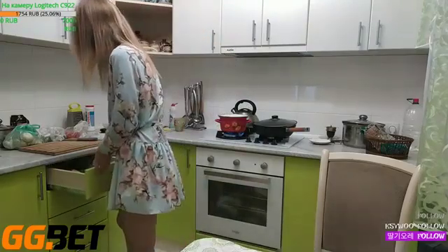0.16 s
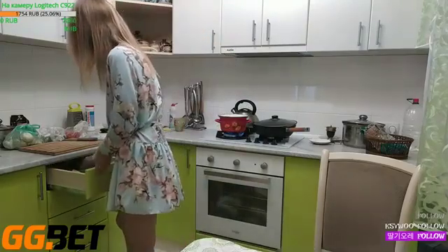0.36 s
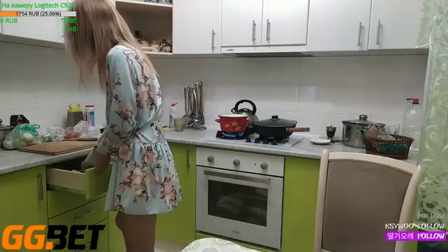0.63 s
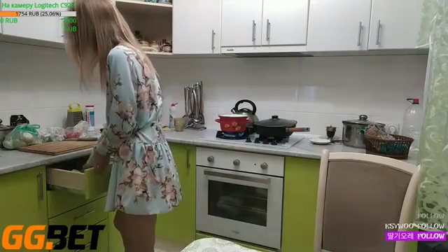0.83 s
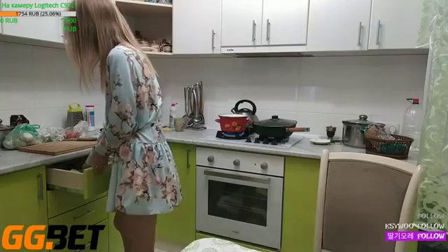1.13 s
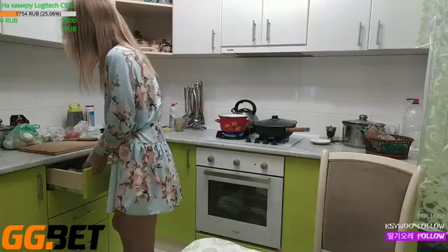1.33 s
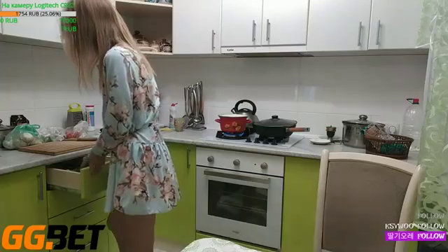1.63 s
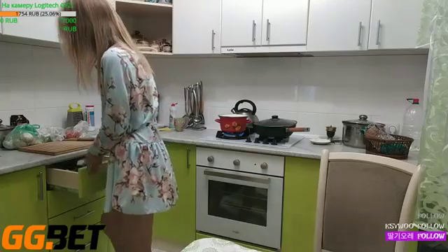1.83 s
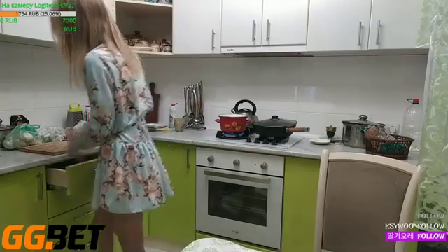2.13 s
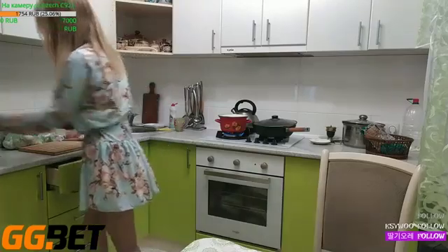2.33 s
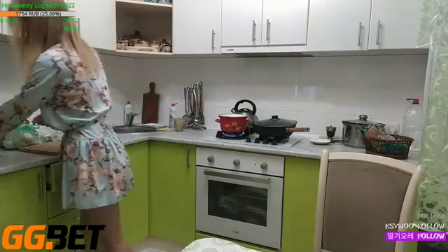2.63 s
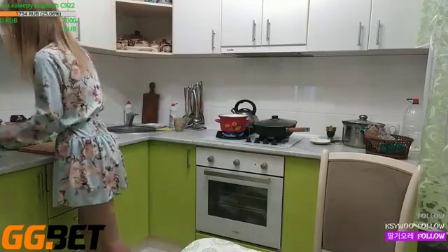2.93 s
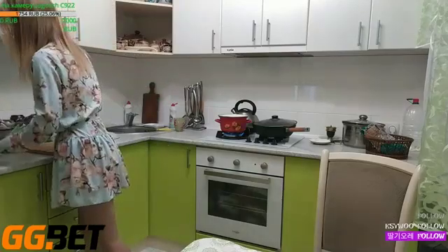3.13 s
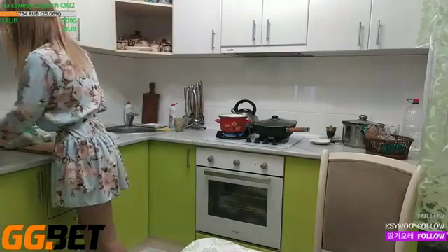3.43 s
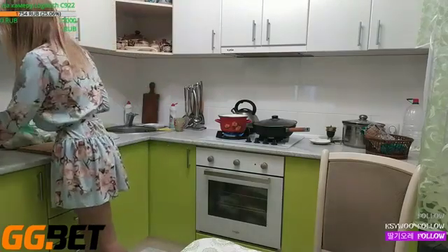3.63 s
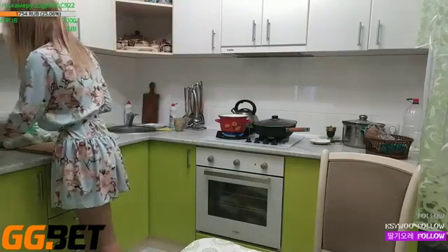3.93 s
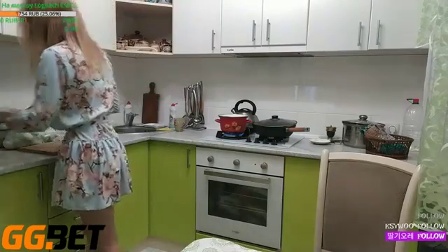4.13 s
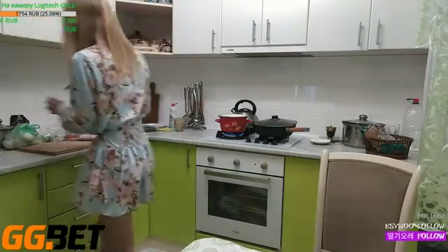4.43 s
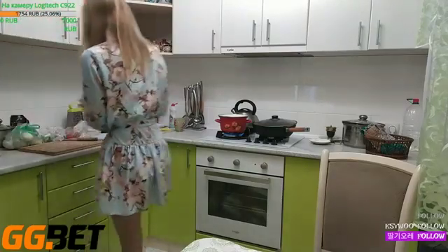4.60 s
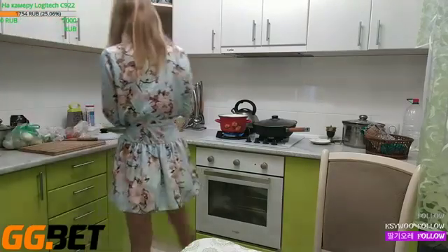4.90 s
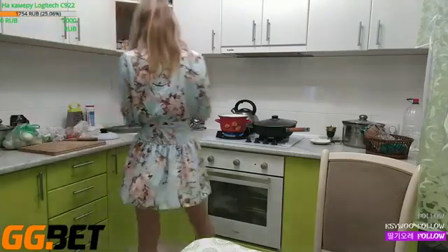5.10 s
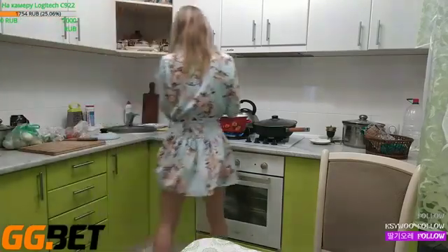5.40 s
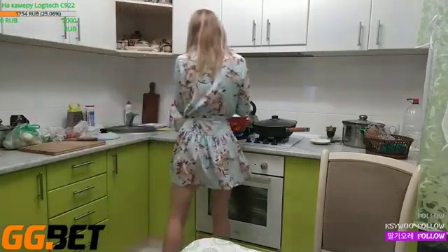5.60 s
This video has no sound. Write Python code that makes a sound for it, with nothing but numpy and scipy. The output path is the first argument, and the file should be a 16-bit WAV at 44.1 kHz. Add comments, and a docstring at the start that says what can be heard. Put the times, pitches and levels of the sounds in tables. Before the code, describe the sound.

Drawer rumble and knocks, clattering steel utensils, a closing roll with faint plastic crinkle, one loud set-down, then small dry rustles and clicks over hiss.

```python
"""Over a steady background hiss of filtered noise, a wooden drawer rolls open in a small tiled kitchen: filtered
grains make its rollers, bursts of tiny impacts its knocks, and soft sine tones swell. A hand rummages in ringing
cutlery. The drawer rolls shut while a plastic bag crinkles as filtered noise. Something is set down hard on the
worktop and shoved along it, again bursts of impacts. At last a small object slides, as a dry rustle of grains, and
clicks lightly, with a faint squeak from a shaky sine. Every contact rings on and echoes across the room."""
import sys
import numpy as np
from scipy import signal
from scipy.fft import rfft, irfft, next_fast_len
from scipy.io import wavfile
from scipy.ndimage import uniform_filter1d

SR = 44100
rng = np.random.default_rng(int(sys.argv[2]) if len(sys.argv) > 2 else 0)


def dump(signal):
    """Clip the signal to [-1, 1] and save it as 16-bit WAV at the path in sys.argv[1]."""
    limited = np.clip(np.atleast_2d(signal).T, -1, 1)
    pcm = np.round(limited * 32767).astype(np.int16)
    wavfile.write(sys.argv[1], SR, pcm)


N = 253619
RING = SR * 3 // 4  # samples in the room's tail and in each ring
# In the tables, "level before trim" is a level that the playing function still shifts by a fixed number of dB.


def amp(db):
    """Turn decibels into a gain."""
    return 10 ** (np.asarray(db) / 20)


def unit(x):
    """Scale x to an rms of 1."""
    return x / np.sqrt(np.mean(x ** 2) + 1e-20)


def crest(x):
    """Scale x so that its loudest 350 samples have an rms of 1."""
    return x / np.sqrt(uniform_filter1d(x ** 2, size=350).max() + 1e-20)


def along(points, hz):
    """Read a curve of (Hz, value) points on a logarithmic frequency axis."""
    point_hz, values = np.transpose(points)
    return np.interp(np.log(hz + 1), np.log(point_hz + 1), values)


def curves(rows):
    """Return a soft gate, open over the rows' time span, then one value per sample for each column."""
    s, *columns = np.transpose(rows)
    t = np.arange(N) / SR
    is_open = (t >= s[0]) & (t <= s[-1])
    gate = uniform_filter1d(is_open * 1., size=900)
    return [gate] + [np.interp(t, s, column) for column in columns]


def filtered(x, response):
    """Shape the spectrum of x by a response that depends on frequency."""
    size = next_fast_len(len(x) + 8192)
    spectrum = rfft(x, size) * response(np.fft.rfftfreq(size, 1 / SR))
    return irfft(spectrum, size)[:len(x)]


def grainy(response, spread_db):
    """Send tiny slips of uneven size through a response, at an rms of 1."""
    sizes = amp(spread_db * rng.standard_normal(N))
    return unit(filtered(rng.standard_normal(N) * sizes, response))


def resonances(peaks):
    """Make the response of a few (Hz, width, dB) resonances whose signs alternate."""
    def response(f):
        total = 0
        for k, (hz, width, db) in enumerate(peaks):
            total = total + (-1) ** k * amp(db) * 1j * f * width / (hz * hz - f * f + 1j * f * width)
        return total
    return response


def impulse_response(spectrum, size=2048):
    """Find the causal sound of a tap on a body with this spectrum."""
    gains = amp(along(spectrum, np.fft.rfftfreq(size, 1 / SR)))
    # folding the cepstrum forward puts the energy as early as possible
    cepstrum = irfft(np.log(gains + 1e-4))
    cepstrum[1:size // 2] *= 2
    cepstrum[size // 2 + 1:] = 0
    return irfft(np.exp(rfft(cepstrum)))


def add(track, s, sound):
    """Mix a sound into the track at time s."""
    start = max(round(s * SR), 0)
    part = track[start:start + len(sound)]
    part += sound[:len(part)]


def swell(peak_s, rise_s, fall_s):
    """Make a smooth stroke: gain 1 at its peak, a tenth rise_s before it and fall_s after it."""
    t = np.arange(N) / SR - peak_s
    return .1 ** ((t / np.where(t < 0, rise_s, fall_s)) ** 2)


def strokes(rows):
    """Add up strokes given as (peak s, dB, rise s, fall s)."""
    return sum(amp(db) * swell(s, rise_s, fall_s) for s, db, rise_s, fall_s in rows)


def tone(hz, jitter):
    """Make a sine at rms 1 whose pitch shakes by this rms fraction, which roughens it."""
    hz = hz * (1 + jitter * grainy(lambda f: f < 120, spread_db=1.5))
    return np.sqrt(2) * np.sin(2 * np.pi * np.cumsum(hz) / SR)


# How long the kitchen echoes. Each row: frequency in Hz, time in seconds to fade by 60 dB.
ECHO_TIMES = [(100, 0.73), (300, 0.38), (1000, 0.37), (4000, 0.37), (13000, 0.12)]


def kitchen(early_db, direct_db=-10, early_s=0.056):
    """Make one path across the room: direct sound, answers from nearby surfaces, a diffuse tail."""
    hz, t, z = signal.stft(rng.standard_normal(RING), SR, nperseg=256)
    decay = amp(-60 * t / along(ECHO_TIMES, hz)[:, None])
    tail = signal.istft(z * decay, SR, nperseg=256)[1][:RING]
    near = np.exp(-np.arange(RING) / SR / early_s)
    # the first reflections are uneven and shifted by early_db
    tail *= amp(near * (early_db + 3.5 * rng.standard_normal(RING)))
    tail /= np.linalg.norm(tail)
    tail[0] += amp(direct_db)
    return tail


def ringing(modes, force, size_factor, damping, uneven_db, waver):
    """Modes build up while the force lasts, at a new strength each time; reflections make them waver."""
    t = np.arange(len(force)) / SR
    hz, mode_db, t60 = np.transpose(modes)[:, :, None]
    knots = np.arange(48) / 64  # moments in s at which the gains are drawn
    shape = (len(modes), len(knots))
    drift = rng.standard_normal(shape) + 1j * rng.standard_normal(shape)
    strength_db = mode_db + uneven_db * rng.standard_normal(hz.shape)
    fade = amp(strength_db - 60 * damping * knots / np.minimum(t60, .5))
    gains = (1 + waver * drift) * fade * np.exp(2j * np.pi * rng.random(hz.shape))
    phases = (2 * np.pi * hz * size_factor * t).astype(np.float32)
    ring = 0
    for gain, phase in zip(gains, phases):
        ring = ring + np.interp(t, knots, gain.real) * np.cos(phase)
        ring = ring + np.interp(t, knots, gain.imag) * np.sin(phase)
    return crest(ring * np.cumsum(force) / force.sum())


# Five pitch ranges, from thud to treble. Each row: lower edge in Hz, upper edge in Hz.
PITCH_RANGES = [(35, 350), (350, 900), (900, 2400), (2400, 5500), (5500, 16000)]


def strikes(events, body, modes, contact_s, ring_db, knock_db, presence_db, trim_db, damping, chatter_db,
            lead_s, partner_db, waver, uneven_db, early_db, ring_growth=0):
    """Each contact is a burst of tiny impacts: it shakes the body, rings both partners and fills the room."""
    track, t = np.zeros(N), np.arange(RING) / SR
    colour = impulse_response(body)
    filters = [signal.butter(4, edges, "bandpass", fs=SR, output="sos") for edges in PITCH_RANGES]
    # the force of a contact peaks after twice contact_s
    contact_s = max(contact_s, .0002)
    u = t / contact_s
    force = u ** 2 * np.exp(-np.minimum(u, 60))
    hardest_db = max(peak_db + bright_db for s, peak_db, thud_db, bright_db in events)
    for s, peak_db, thud_db, bright_db in events:
        impacts = force * rng.standard_normal(RING) * amp(chatter_db * rng.standard_normal(RING))
        # a short, hard contact is mostly one single impact
        impacts[1] += np.linalg.norm(impacts) * (.001 / contact_s) ** 1.5
        shake = signal.fftconvolve(impacts, colour)[:RING]
        shake = signal.fftconvolve(shake, kitchen(early_db))[:RING]
        own = ringing(modes, force, 1, damping, uneven_db, waver)
        # the other partner is a like piece of another size
        other = ringing(modes, force, rng.uniform(.72, 1.2), damping, uneven_db, waver)
        # where ring_growth is set, hard blows throw the pieces free, so that they ring more
        blow_ring_db = ring_db + ring_growth * (peak_db + bright_db - hardest_db)
        sound = crest(shake) + amp(blow_ring_db) * (own + amp(partner_db) * other)
        # thud sets the bass and brightness the treble; each pulls its neighbour by half
        band_db = [thud_db, thud_db / 2 + knock_db, 0, bright_db / 2 + presence_db, bright_db]
        blow = sum(amp(db) * crest(signal.sosfilt(sos, sound)) for sos, db in zip(filters, band_db))
        add(track, s - lead_s, amp(peak_db + trim_db) * blow)
    return track


# The broad colour of the background hiss. Each row: frequency in Hz, relative level in dB.
HISS_COLOUR = [(30, -21.5), (200, -11.5), (700, -16.5), (1200, -17.5), (2600, -25), (3300, -5.5),
               (4300, -1.5), (5700, -1), (7300, -38), (8200, 0), (10300, -3.5), (11400, -16.5), (12200, 3),
               (13300, -24.5), (15000, -15)]
# Narrow bands that stand out in the background hiss.
# Each row: centre in Hz, half-width in Hz (gain down to 1/e), relative level in dB.
HISS_BANDS = [(3230, 63, 3.5), (4274, 210, 4.5), (5064, 56, 5), (5700, 90, 1.5), (6440, 100, -4),
              (8060, 140, -1.5), (8800, 34, -10.5), (13300, 60, -11), (14800, 130, -12.5)]


def hiss(broad_db=-58, bands_db=-61):
    """A steady background hiss, random at every pitch, with a few narrow bands standing out."""
    def bumps(f):
        return sum(amp(db) * np.exp(-((f - hz) / width) ** 2) for hz, width, db in HISS_BANDS)
    broad = unit(filtered(rng.standard_normal(N), lambda f: amp(along(HISS_COLOUR, f))))
    bands = unit(filtered(rng.standard_normal(N), bumps))
    return amp(broad_db) * broad + amp(bands_db) * bands


# Runs of the drawer. Each row: time of top speed in seconds, rumble level before trim in dB,
# level before trim of rattle and rasp in dB, rise and fall of the speed to a tenth in seconds.
DRAWER_RUNS = [(0.01, -40.5, -46.5, 0.062, 0.28), (2.08, -45, -43, 0.17, 0.18), (2.22, -45, -45, 0.14, .45),
               (2.5, -46, -52.5, 0.27, 0.41), (2.92, -49, -62, 0.053, 0.091)]
# Friction in the runners. Each row: frequency in Hz, relative level in dB.
RUNNER_COLOUR = [(120, -37), (200, -22), (241, 5), (469, -11.5), (512, -16), (634, -21), (755, -3.5),
                 (1030, -31.5), (1280, -9.5), (1710, -20.5), (2360, -21.5), (2580, -27.5), (4000, -20.5),
                 (5200, -51.5), (8800, -120)]
# Resonance of the cabinet. Each row: frequency in Hz, width in Hz, gain in dB.
CABINET = [(138.7, 15, 0)]
# Resonances of the drawer's panels. Each row: frequency in Hz, width in Hz, relative gain in dB.
DRAWER_PANELS = [(525.2, 16, 14), (774, 19, 2)]


def rollers():
    """The rollers bump along their runners, drum on cabinet and panels, and rasp; all grow with speed."""
    def runner(f):
        return amp(along(RUNNER_COLOUR, f))
    rumble = grainy(lambda f: resonances(CABINET)(f) / (1 + (f / 300) ** 4), spread_db=1.5)
    panels = grainy(lambda f: resonances(DRAWER_PANELS)(f) / (1 + (f / 1100) ** 4), spread_db=11.5)
    low_friction = grainy(lambda f: runner(f) / (1 + (f / 900) ** 8), spread_db=6)
    rattle = unit(amp(-4) * panels + low_friction)
    rasp = grainy(lambda f: runner(f) * (f > 950), spread_db=2.0)
    # bumps make the speed lurch, by 1.5 dB rms
    lurch = amp(1.5 * grainy(lambda f: f < 18, spread_db=3.5))
    out = np.zeros(N)
    for s, rumble_db, rattle_db, rise_s, fall_s in DRAWER_RUNS:
        speed = swell(s, rise_s, fall_s) * lurch
        out += amp(rumble_db - 2) * speed * rumble
        out += amp(rattle_db - 1) * speed ** 1.7 * rattle
        out += amp(rattle_db - 13) * speed ** 2 * rasp
    return out


# Knocks of the drawer. Each row: time in seconds, level of the mids before trim in dB,
# thud (bass against mids) in dB, brightness (treble against mids) in dB.
DRAWER_CONTACTS = [(0.056, -48, -14, -3), (0.172, -29, -12, -19.5), (0.565, -50.5, -8.5, -31),
                   (0.659, -37, -11, -14.5), (0.784, -50, -23, -6), (0.854, -26, -12.5, 2.5),
                   (0.871, -38, -2.5, 9.5), (2.058, -39, -1, -5), (2.582, -50.5, -9, -13.5),
                   (2.786, -37, 6.5, -14.5)]
# How the drawer's wood colours a knock. Each row: frequency in Hz, relative level in dB.
DRAWER_COLOUR = [(41, -49.5), (70, -15), (361, -7), (632, -2), (791, -6), (926, -8.5), (1390, 5.5),
                 (1940, -6.5), (2720, -11.5), (3480, -4.5), (4880, -20), (5340, -14), (7480, -19),
                 (9360, -11), (15000, -18.5)]
# What the drawer rings with. Each row: frequency in Hz, relative level in dB,
# time to fade by 60 dB in seconds (at most 0.5 is used, then divided by the damping).
DRAWER_RINGS = [(348, -6, 1), (728, -14, 0.56), (1417, 10, 0.15), (1670, -7, 0.71), (2176, 0.5, 0.099),
                (2304, 2, 0.23), (2360, -6, 0.1), (3260, -6, 0.22), (3630, -21, 0.58), (4550, -4, 0.098)]


def drawer_knocks():
    """Wood meets wood in soft contacts: a chattering shake and only a little ringing."""
    return strikes(DRAWER_CONTACTS, DRAWER_COLOUR, DRAWER_RINGS, contact_s=0.0026, ring_db=-15, knock_db=3.5,
                   presence_db=-0.5, trim_db=-3.0, damping=1.1, chatter_db=5.0, lead_s=.003, partner_db=-1,
                   waver=0.59, uneven_db=4.5, early_db=6.0)


# Soft low tones while the drawer is moved. Each row: time of the peak in seconds, level before trim in dB,
# mean pitch in Hz, rise and fall to a tenth in seconds.
LOW_TONES = [(0.321, -48, 337, .14, 0.13), (0.583, -43.5, 275, 0.019, 0.065), (0.695, -44, 280, .06, 0.032),
             (0.81, -61, 266, 0.07, 0.12)]


def low_tones(trim_db=3):
    """Smooth, almost pure low tones swell and fade as the drawer is moved."""
    return sum(amp(db + trim_db) * swell(s, rise_s, fall_s) * tone(hz, jitter=0.0066)
               for s, db, hz, rise_s, fall_s in LOW_TONES)


# How hard the hand stirs the tray. Each row: time in seconds,
# level of the small contacts in dB before scatter and trim.
STIRRING = [(1.171, -30.5), (1.23, -33.5), (1.29, -45), (1.35, -34), (1.42, -56), (1.5, -33.5), (1.62, -38),
            (1.77, -39.5), (1.811, -51.5), (1.87, -28), (1.9, -38.5)]


def jostle(count, thud_db=-4, bright_db=-1, scatter_db=1.5, scatter_s=.005):
    """Small contacts come at uneven moments while the hand stirs the cutlery."""
    s, db = np.transpose(STIRRING)
    chance = rng.standard_normal((count, 4))
    times = np.linspace(s[0], s[-1], count) + scatter_s * chance[:, 0]
    shifts_db = scatter_db * chance[:, 1:]
    return [(t, np.interp(t, s, db) + level, thud_db + thud, bright_db + bright)
            for t, (level, thud, bright) in zip(times, shifts_db)]


# Clashes of the cutlery. Each row: time in seconds, level of the mids before trim in dB,
# thud in dB, brightness in dB (bass and treble against the mids).
CLASHES = [(1.15, -24, -12, -7), (1.184, -35, -2, 3), (1.221, -29.5, -4.5, -8), (1.25, -29, -11, -3),
           (1.313, -32.5, -5.5, 3), (1.351, -37.5, -7.5, 7.5), (1.434, -36.5, 1, 10),
           (1.455, -31, -4, -3.5), (1.486, -34, -6, 9.5), (1.518, -28, -8.5, -18),
           (1.547, -35.5, -2.5, 6.5), (1.633, -23.5, -6, 11.5), (1.648, -21.5, -5, 2.5),
           (1.751, -26.5, -8, 1), (1.829, -22.5, -9, 2.5), (1.855, -27.5, -9, 3.5), (2.005, -36, -4, -4)]
# How the cutlery tray colours a contact. Each row: frequency in Hz, relative level in dB.
TRAY_COLOUR = [(41, -40), (70, -24.5), (206, -14.5), (288, -1), (386, -13.5), (505, -1.5), (632, -7.5),
               (1300, 1), (1940, -10.5), (3640, -4.5), (4670, -11), (5970, -10), (7650, -13.5),
               (10200, -5.5), (15000, -21)]
# What the steel rings with. Each row: frequency in Hz, relative level in dB,
# time to fade by 60 dB in seconds (at most 0.5 is used, then divided by the damping).
STEEL_RINGS = [(3564, -12.7, 0.43), (4032, -13.6, 0.42), (4247, -12.9, 0.41), (5884, -13.3, 0.37),
               (6078, 0.0, 0.37), (6885, -8.3, 0.36), (7063, -10.9, 0.35), (8452, -5.2, 0.34),
               (9200, -7.8, 0.33), (9318, -11.5, 0.33), (9458, -13.6, 0.32), (10153, -11.2, 0.32),
               (10390, -6.9, 0.32), (10557, -10.8, 0.31), (11181, -14.1, 0.31), (11300, -11.5, 0.31),
               (12209, -16.2, 0.3), (12355, -15.6, 0.3), (12538, -10.6, 0.3), (13674, -13.7, 0.29),
               (14163, -12.3, 0.29), (14395, -10.4, 0.29), (14702, -11.1, 0.28), (14831, -17.1, 0.28)]


def cutlery():
    """Steel pieces clash and jostle in the tray; both partners ring, more so after hard blows."""
    return strikes([*CLASHES, *jostle(count=20)], TRAY_COLOUR, STEEL_RINGS, contact_s=.0021, ring_db=2.5,
                   knock_db=-1.0, presence_db=-5, trim_db=-5.5, damping=1.38, chatter_db=7, lead_s=0.0041,
                   partner_db=-4.5, waver=0.895, uneven_db=6.5, early_db=5.0, ring_growth=0.53)


# Clinks of a small piece of cutlery. Each row: time in seconds, level of the mids before trim in dB,
# thud in dB, brightness in dB (bass and treble against the mids).
SMALL_CLINKS = [(1.186, -37, -13, -5), (1.247, -42.5, -18.5, 0), (1.383, -42.5, -17, -2),
                (1.436, -34, -17, -4.5), (1.547, -41, -12, -3.5)]
# What the small piece rings with. Each row: frequency in Hz, relative level in dB,
# time to fade by 60 dB in seconds (at most 0.5 is used, then divided by the damping).
CLINK_RINGS = [(3390, -11.5, 1.3), (3630, -2, 0.25), (3930, -9.5, 0.49), (4334, -10, 0.38),
               (4463, -24.5, 5.0)]


def clinks():
    """A small piece of cutlery clinks in the tray, strong in its upper mids and quickly damped."""
    return strikes(SMALL_CLINKS, TRAY_COLOUR, CLINK_RINGS, contact_s=0.0017, ring_db=-3, knock_db=-3,
                   presence_db=14.5, trim_db=-6.5, damping=2.0, chatter_db=6, lead_s=.004, partner_db=-9,
                   waver=0.78, uneven_db=1.0, early_db=-3)


# Brushes against a plastic bag. Each row: time of the peak in seconds, level before trim in dB,
# rise and fall to a tenth in seconds.
BAG_BRUSHES = [(2.66, -53.5, .08, 0.29), (2.98, -53.5, .02, .03), (3.03, -49, .02, .11)]


def bag(trim_db=-3):
    """Thin plastic crinkles softly: uneven grains above 3 kHz."""
    crinkle = grainy(lambda f: (f > 3000) / (1 + f / 6000), spread_db=8)
    return amp(trim_db) * crinkle * strokes(BAG_BRUSHES)


# Something set down on the worktop. Each row: time in seconds, level of the mids before trim in dB,
# thud in dB, brightness in dB (bass and treble against the mids).
SET_DOWN = [(3.192, -14.5, -20, -24), (3.279, -31, -11.5, -26)]
# How the worktop colours a blow. Each row: frequency in Hz, relative level in dB.
WORKTOP_COLOUR = [(20, -48), (50, -34), (120, -22), (220, -16), (360, -7), (550, -10), (750, -7), (1100, 0),
                  (1400, 0), (2000, -4), (2500, -12), (3000, -18), (4000, -26), (7000, -35), (15000, -55)]
# What the worktop rings with. Each row: frequency in Hz, relative level in dB,
# time to fade by 60 dB in seconds (at most 0.5 is used, then divided by the damping).
WORKTOP_RINGS = [(360, -13.5, 0.31), (447, -12, 0.25), (678, -8.5, 0.57), (813, -9.5, 0.55),
                 (1060, -11.5, 0.41), (1227, -11.5, 0.35), (1324, -5, 0.34), (1440, -5, 0.2),
                 (1577, -11, 0.29), (1740, 0, 0.17), (1810, -8, 0.24), (1900, -7, 0.61), (2180, 1, 0.1),
                 (2350, -11.5, 0.43)]


def worktop():
    """A very short, hard contact gives almost one single impact, and the worktop rings."""
    return strikes(SET_DOWN, WORKTOP_COLOUR, WORKTOP_RINGS, contact_s=0.00037, ring_db=-8, knock_db=3,
                   presence_db=-1, trim_db=-2, damping=1.4, chatter_db=9.0, lead_s=.0001, partner_db=-10,
                   waver=.26, uneven_db=0.0, early_db=3)


# Shoves along the worktop. Each row: time in seconds, level of the mids before trim in dB,
# thud in dB, brightness in dB (bass and treble against the mids).
SHOVE_CONTACTS = [(3.754, -53.5, -13.5, -13.5), (3.789, -46, -10, -12), (3.836, -31, -10, -1.5),
                  (3.854, -35.5, -0.5, 3.5), (3.891, -27, -6, -9.5)]
# How a shove is coloured. Each row: frequency in Hz, relative level in dB.
SHOVE_COLOUR = [(41, -63), (70, -34), (432, -9.5), (528, -5.5), (647, -2.5), (1390, -7), (2170, -20.5),
                (2380, -19.5), (5340, -37.5), (9360, -10), (10500, -16.5), (12000, -7.5), (15000, -21)]
# What a shove rings with. Each row: frequency in Hz, relative level in dB,
# time to fade by 60 dB in seconds (at most 0.5 is used, then divided by the damping).
SHOVE_RINGS = [(423.4, -9, 0.19), (540, -8, 0.25), (710, -8.5, 0.26), (1090, -17.5, 0.93), (1176, 0, 0.092),
               (1305, -6.5, 0.27), (1470, -0.5, 0.086)]


def shoves():
    """Shoves along the worktop are longer contacts, so their many impacts blur together."""
    return strikes(SHOVE_CONTACTS, SHOVE_COLOUR, SHOVE_RINGS, contact_s=0.0041, ring_db=-5, knock_db=0.5,
                   presence_db=0.0, trim_db=-4.5, damping=0.91, chatter_db=6.5, lead_s=.006, partner_db=-9,
                   waver=0.36, uneven_db=3, early_db=3)


# Something slides in the hands. Each row: time of the peak in seconds, level before trim in dB,
# rise and fall to a tenth in seconds.
SLIDES = [(4.27, -74, 0.046, 0.061), (4.67, -70.5, .15, 0.15), (4.92, -41, 0.05, 0.18),
          (5.25, -63, 0.096, .07), (5.55, -56, 0.055, .08), (5.625, -40.5, 0.054, 0.12)]
# How the small object colours its slides and clicks. Each row: frequency in Hz, relative level in dB.
CLICK_COLOUR = [(120, -66.5), (200, -42.5), (326, -35.5), (451, -23.5), (560, -18.5), (833, -5),
                (1410, 4.5), (4720, -9.5), (5550, -1), (7420, -19), (9900, -11.5), (11400, -16.5),
                (15000, -16.5)]


def rubbing(trim_db=-2):
    """The small object that clicks also slides with a dry rustle of uneven grains."""
    rustle = grainy(lambda f: amp(along(CLICK_COLOUR, f)), spread_db=5.5)
    return amp(trim_db) * rustle * strokes(SLIDES)


# Light clicks. Each row: time in seconds, level of the mids before trim in dB,
# thud in dB, brightness in dB (bass and treble against the mids).
LIGHT_CLICKS = [(4.851, -40, -27, 10), (4.887, -41, -21.5, 0.5), (5.133, -49, -64.5, 6.5),
                (5.524, -51, -53, 2.5), (5.6, -46.5, -27, 1), (5.616, -41.5, -16, -20)]
# What the clicks ring with. Each row: frequency in Hz, relative level in dB,
# time to fade by 60 dB in seconds (at most 0.5 is used, then divided by the damping).
CLICK_RINGS = [(1265, -11, 5.0), (2616, -21, 5.0), (5593, -9, 1.6), (6056, -18, 2.9), (8183, -21, 0.84),
               (9647, 0, 0.22), (13500, -3, 0.15), (14590, -33, 5.0)]


def clicks():
    """A small object clicks in light contacts whose ringing wavers strongly."""
    return strikes(LIGHT_CLICKS, CLICK_COLOUR, CLICK_RINGS, contact_s=0.002, ring_db=-6, knock_db=11.5,
                   presence_db=1.0, trim_db=-7.5, damping=1.2, chatter_db=6.5, lead_s=.004, partner_db=-4.5,
                   waver=1.3, uneven_db=4.5, early_db=0.0)


# A faint rough squeak. Each row: time in seconds, mean pitch in Hz, level before trim in dB.
SQUEAK_PATH = [(5.12, 1450, -74), (5.15, 1400, -52), (5.2, 1340, -70), (5.25, 1270, -62), (5.33, 1190, -75)]


def squeak(trim_db=-2):
    """A faint squeak falls in pitch, made rough by strong jitter."""
    gate, hz, db = curves(SQUEAK_PATH)
    return gate * amp(db + trim_db) * tone(hz, jitter=0.053)


def scene():
    """Add up all the sounds, in the order in which they are first heard."""
    drawer = rollers() + drawer_knocks() + low_tones()
    rummage = cutlery() + clinks() + bag()
    on_worktop = worktop() + shoves()
    small_object = rubbing() + clicks() + squeak()
    return (hiss() + drawer + rummage + on_worktop + small_object)[None]


TOP_HZ = 15080  # upper limit of the sound


def record(dry):
    """Everything above the upper frequency limit is removed."""
    return filtered(dry[0], lambda f: f < TOP_HZ)[None]


dry = scene()
out = record(dry)
dump(out)
```